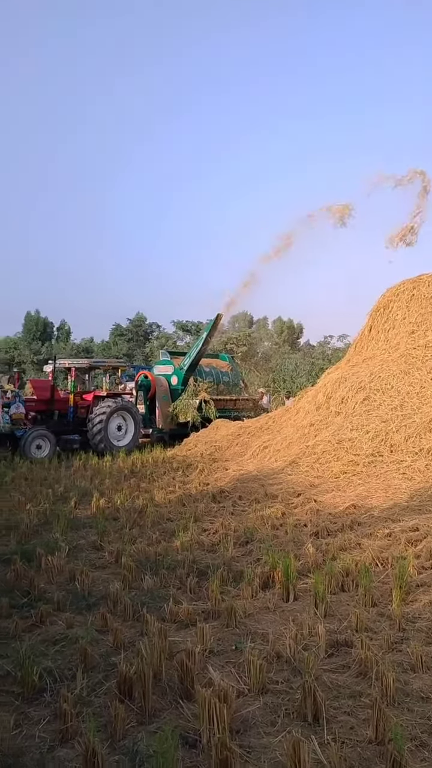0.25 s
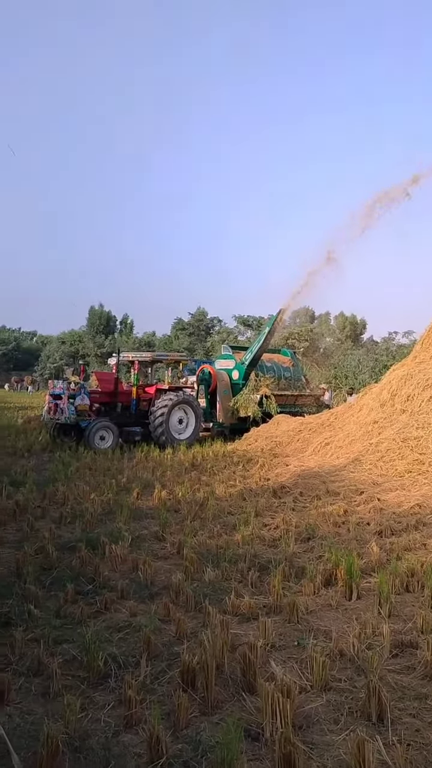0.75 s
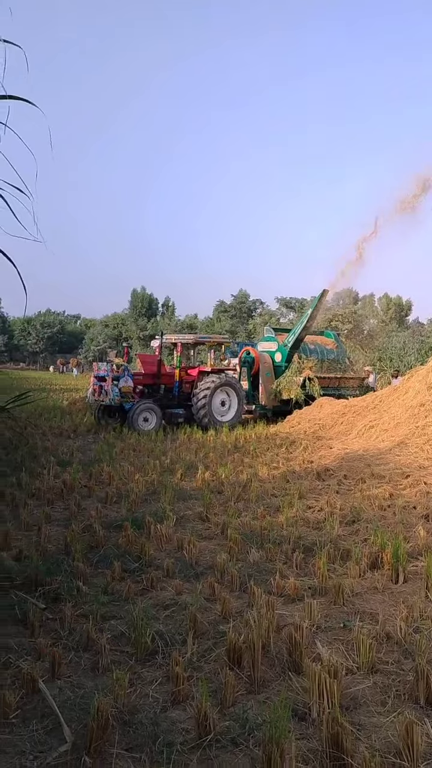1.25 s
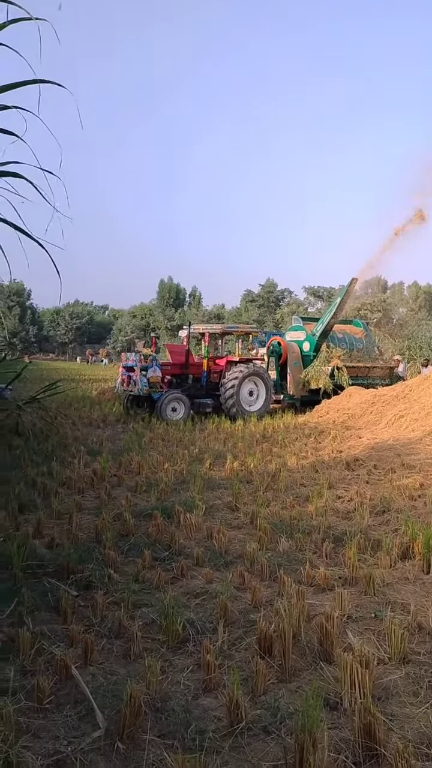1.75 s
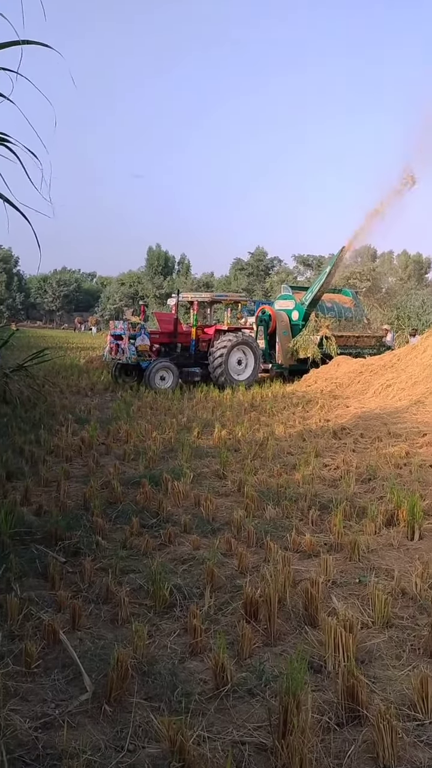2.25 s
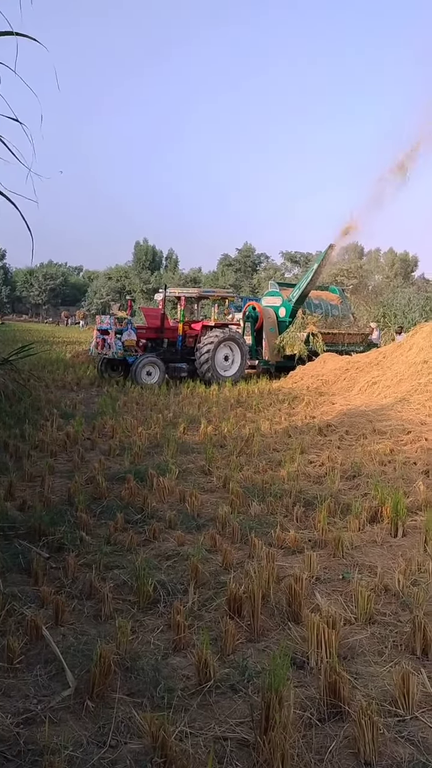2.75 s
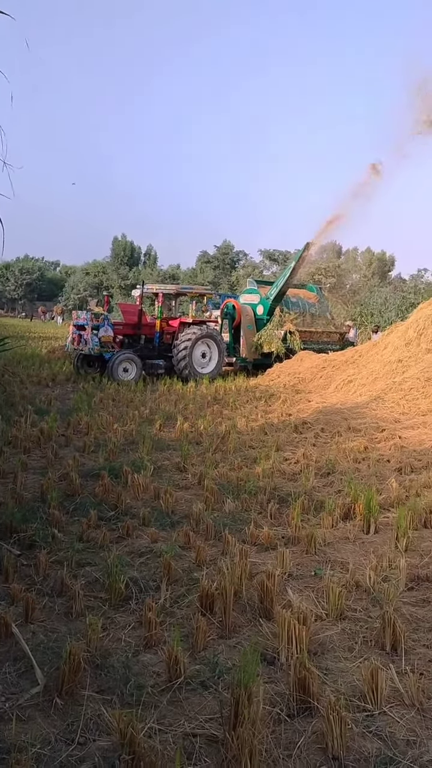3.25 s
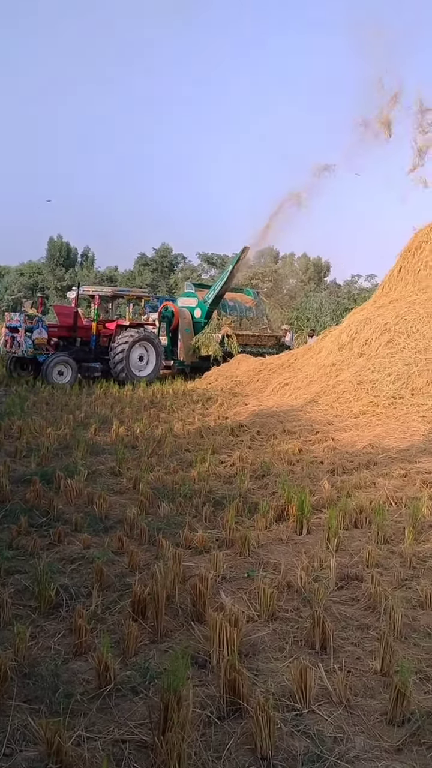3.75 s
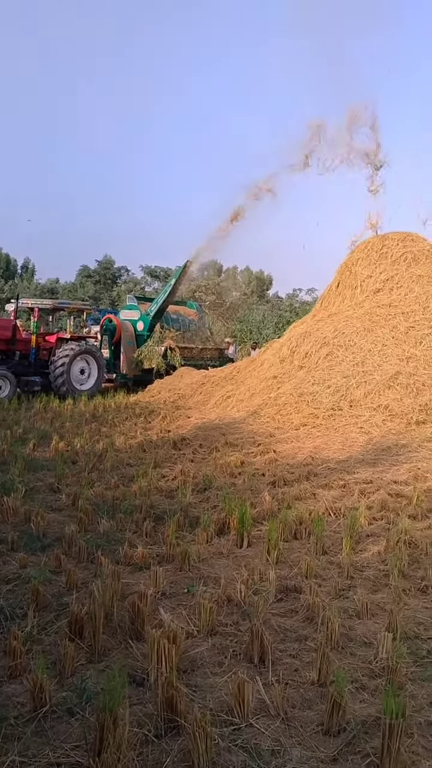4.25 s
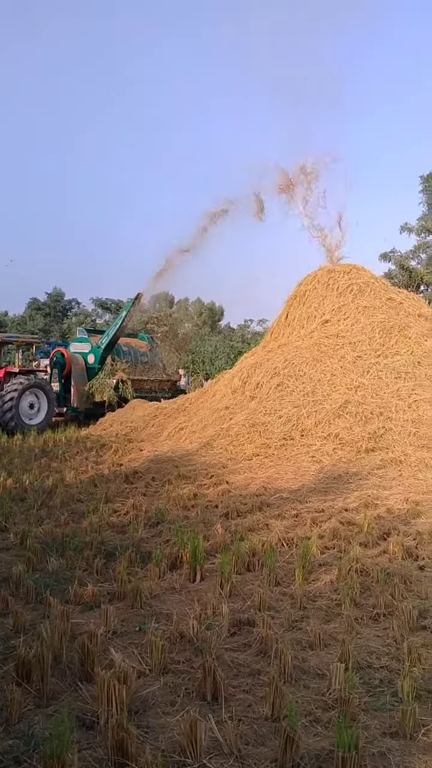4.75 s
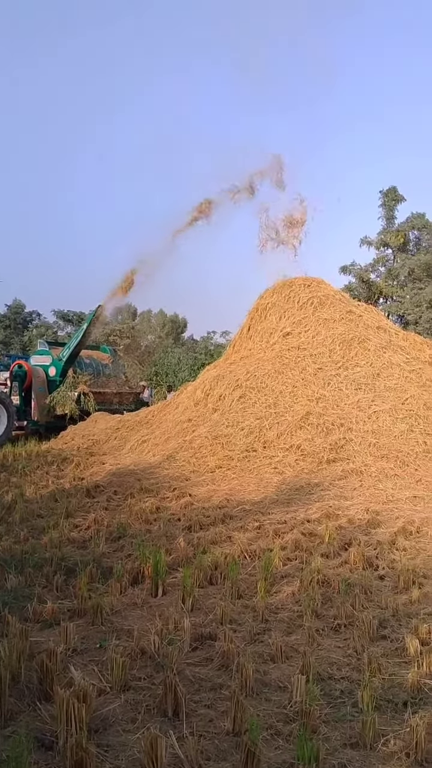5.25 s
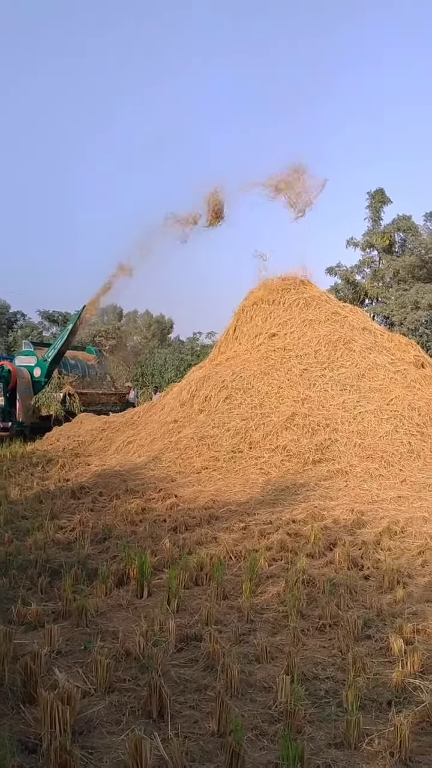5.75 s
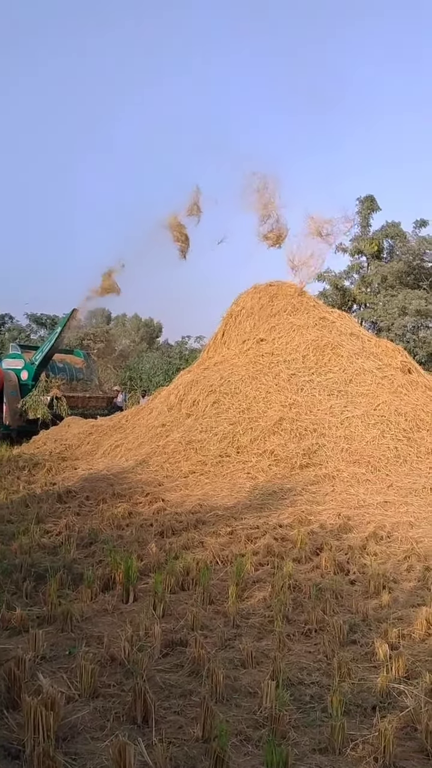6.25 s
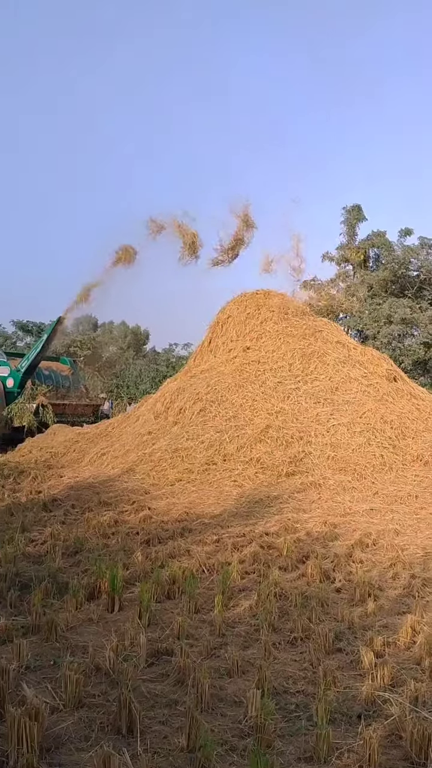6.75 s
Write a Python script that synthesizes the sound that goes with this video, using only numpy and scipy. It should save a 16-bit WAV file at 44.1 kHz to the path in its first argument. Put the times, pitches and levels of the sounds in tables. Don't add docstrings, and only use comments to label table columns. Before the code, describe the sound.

A tractor diesel drives a thresher in a harvested field, already running at the start and never stopping. A low blower hum sits under a broad, metallic roar of air and straw, with rapid diesel clatter and faint chaff hiss on top. Around five seconds a heavier feed drags the pitch down slightly, then it recovers. Heard across open stubble through a slowly turning phone, with slightly coarse treble.

```python
import sys
import numpy as np
from scipy import signal
from scipy.fft import rfft, irfft, dct, next_fast_len
from scipy.io import wavfile
from scipy.ndimage import uniform_filter1d, map_coordinates

SR = 44100
rng = np.random.default_rng(int(sys.argv[2]) if len(sys.argv) > 2 else 0)


def master_out(mix):
    frames = np.transpose(np.atleast_2d(mix))
    ceiling = np.clip(frames, -1, 1)
    pcm = np.round(ceiling * 32767).astype(np.int16)
    wavfile.write(sys.argv[1], SR, pcm)


def linear_from_db(decibels):
    return 10 ** (np.asarray(decibels, float) / 20)


N = 309582

# time_s, blade_pass_hz
BLADE_PASS = [(0, 138.6), (.3, 138.4), (1.2, 139.9), (1.55, 139.7), (1.95, 138.5), (3.2, 139.7),
              (4.4, 139.9), (4.75, 139.4), (5.02, 136.5), (5.3, 135.9), (5.6, 136.3), (6.25, 138.3),
              (7.02, 139.3)]
FREE_BLADE_PASS_HZ = 139.8
BLOWER_BLADES = 5
BLOWER_TURNS_PER_CYCLE = 2.1113
CYCLE_AT_START = .92


def unit(x):
    return x / np.sqrt(np.mean(x ** 2) + 1e-20)


def along(points, hz):
    f, v = np.transpose(points)
    return np.interp(np.log(hz + 1), np.log(f + 1), v)


def curves(rows):
    time_s, *columns = np.transpose(rows)
    return [np.interp(np.arange(N) / SR, time_s, column) for column in columns]


def wobble(knots_per_s):
    knots = rng.standard_normal(int(N * knots_per_s / SR) + 4)
    return map_coordinates(knots, [np.arange(N) * knots_per_s / SR])


def filtered(x, response):
    pad = 2048
    wide = np.pad(x, [(0, 0)] * (x.ndim - 1) + [(pad, pad)], mode="reflect")
    m = next_fast_len(N + 4 * pad)
    spectrum = rfft(wide, m) * response(np.fft.rfftfreq(m, 1 / SR))
    return irfft(spectrum, m)[..., pad:pad + N]


def patchy(patchy_db):
    z = signal.stft(rng.standard_normal((3, N)), nperseg=512)[2]
    field = uniform_filter1d(rng.standard_normal(z.shape[1:]), size=7, axis=0)
    field = uniform_filter1d(field, size=10, axis=1)
    return signal.istft(z * linear_from_db(patchy_db * unit(field)), nperseg=512)[1][:, :N]


def repeating(noise, cycle, share, size=3350):
    pattern = rng.standard_normal((len(noise), size))[:, (cycle % 1 * size).astype(int)]
    return np.sqrt(1 - share) * unit(noise) + np.sqrt(share) * pattern


def orders(turns, table, sway_db):
    total = np.zeros(N)
    for order, db in table:
        level = np.sqrt(2) * linear_from_db(db + sway_db * wobble(14))
        total += level * np.cos(2 * np.pi * (order * turns + rng.random()))
    return total


def knocks(cycle, blows, decay, rise, scatter_db):
    out = np.zeros(N)
    for place, db in blows:
        turns = cycle - place + 1
        size = linear_from_db(db + scatter_db * rng.standard_normal(int(turns[-1]) + 2))
        since = turns % 1
        out += size[turns.astype(int)] * np.exp(-since / decay) * (1 - np.exp(-since / rise))
    return out


def panel_gain(f, panels):
    resonances = sum(linear_from_db(db) ** 2 * width ** 2 / (width ** 2 + 4 * (f - centre) ** 2)
                     for centre, width, db in panels)
    return np.sqrt(1 + resonances)


def casing(f):
    # centre_hz, width_hz, level_db over the noise
    panels = [(228.5, 14, 6), (2390, 65, -6.5), (603.6, 4.1, 9), (698.6, 44, 4), (867, 24, 2.5),
              (990, 27, 2), (1051, 4.3, 3.5), (1155, 27, -5.5), (1327, 17, 4.5), (1463, 80, 3),
              (1620, 15, -3.5), (2197, 10, -16), (2573, 6.4, 6.5), (2860, 13, -10.5), (3200, 45, 1.5),
              (3880, 40, -9.5), (4390, 150, -1), (5840, 300, -0.5), (7840, 260, 2.5)]
    return panel_gain(f, panels)


def sag_hz():
    return FREE_BLADE_PASS_HZ - curves(BLADE_PASS)[0]


def heading():
    # time_s, heading
    phone_heading = [
        (0, 0.7),
        (1, 0.26),
        (1.8, 0.3),
        (3.8, 0.2),
        (4.5, 0.48),
        (5.3, 0.8),
        (7.02, 0.7),
    ]
    return np.clip(curves(phone_heading)[0], 0, 1)


def blower(shaft):
    blade_orders = [(4, -23), (5, 0.5), (6, -32.5), (8, -26.5), (10, -20)]
    level_db = -26.5 - .56 * sag_hz() + .5 * wobble(6)
    return linear_from_db(level_db) * orders(shaft, blade_orders, sway_db=.4)


def exhaust(cycle):
    firing_orders = [(4, 0.5), (8, -1)]
    return linear_from_db(-40 + .02 * sag_hz()) * orders(cycle, firing_orders, sway_db=.2)


def chassis(cycle):
    frame_orders = [(12, -5.5), (14, -7.5), (16, -3), (22, -9.5), (23, -18), (24, -19), (26, -25)]
    return linear_from_db(-40 - 1.76 * sag_hz()) * orders(cycle, frame_orders, sway_db=.4)


def roar(shaft):
    # freq_hz, level_db_per_hz
    rush_spectrum = [(20, -42), (40, -17), (65, -10.5), (130, -2.5), (220, -4), (300, -4.5), (450, -12),
                     (700, -9.5), (1000, -10), (1450, -12), (1650, -14.5), (2200, -11.5), (4000, -20),
                     (8000, -66)]
    boom_top_hz, boom_db_per_hz_sag = 380, -.4
    swell = linear_from_db(.7 * np.cos(2 * np.pi * shaft) + .4 * wobble(9))
    rush = filtered(swell * patchy(patchy_db=.7), lambda f: linear_from_db(along(rush_spectrum, f)) * casing(f))
    boom = filtered(rush, lambda f: 1 / (1 + (f / boom_top_hz) ** 4))
    thinned = rush + (linear_from_db(boom_db_per_hz_sag * sag_hz()) - 1) * boom
    return linear_from_db(-35 - .53 * heading()) * unit(thinned)


def clatter(cycle):
    firings = [
        (0, -6.5),
        (0.251, -1.5),
        (0.501, -2.5),
        (0.751, -2.5),
    ]
    # freq_hz, level_db_per_hz
    block_spectrum = [(400, -42.5), (900, -6.5), (1400, 0), (1700, 0.5), (2200, 3), (2700, -17), (3600, -7),
                      (4300, -11.5), (5200, -17.5), (6500, -25.5), (7500, -38), (8200, -51), (9000, -91)]
    gate = 1.1 + knocks(cycle, firings, decay=.098, rise=.012, scatter_db=0)
    noise = repeating(patchy(patchy_db=.6), cycle, share=.65)
    rattle = filtered(gate * linear_from_db(.45 * wobble(9.7)) * noise,
                      lambda f: linear_from_db(along(block_spectrum, f)) * casing(f))
    return linear_from_db(-43 + 2.65 * heading()) * unit(rattle)


def tappets(cycle):
    snaps = [
        (.1, -3),
        (.21, -4),
        (.3, -3),
        (.5, -1),
        (.75, -3),
        (.83, -3),
    ]
    # freq_hz, level_db_per_hz
    cover_spectrum = [(400, -64.5), (700, -26), (950, 2), (1250, 8.5), (1600, 3), (2200, -2.5), (3500, -33),
                      (5000, -61.5), (7000, -120)]
    gate = knocks(cycle, snaps, decay=.045, rise=.006, scatter_db=1.5)
    noise = repeating(patchy(patchy_db=1.3), cycle, share=.85)
    return linear_from_db(-48) * unit(filtered(gate * noise, lambda f: linear_from_db(along(cover_spectrum, f))))


def pings(cycle):
    modes = [
        (.26, 1050, -38),
        (.26, 2100, -41),
        (.49, 1400, -38),
        (.52, 2400, -36.5),
        (.76, 1480, -36),
        (.75, 3700, -46),
    ]
    rise_s, fall_s, scatter_db, detune = .0012, .003, 1.5, .006
    out = np.zeros(N)
    cycle_s = 1 / (SR * np.gradient(cycle))
    for place, hz, db in modes:
        turns = cycle - place + 1
        draws = rng.standard_normal((int(turns[-1]) + 2, 2))
        size, pitch = draws[turns.astype(int)].T
        t = turns % 1 * cycle_s
        shape = 2 * np.exp(-t / fall_s) * (1 - np.exp(-t / rise_s))
        out += linear_from_db(db + scatter_db * size) * shape * np.sin(2 * np.pi * hz * (1 + detune * pitch) * t)
    return out


def chaff(cycle):
    # freq_hz, level_db_per_hz
    hiss_spectrum = [(7000, -26.5), (8300, -12.5), (8900, -8), (9600, -6.5), (11000, 1), (12700, 0.5),
                     (14500, 1.5), (15700, -1)]
    pulse_db = 1.1 * np.cos(2 * np.pi * (4 * cycle - .25))
    gate = linear_from_db(pulse_db + .3 * wobble(13) + .8 * wobble(24))
    hiss = filtered(gate * patchy(patchy_db=.5)[1:], lambda f: linear_from_db(along(hiss_spectrum, f)))
    return linear_from_db(-62.9 + 3 * heading()) * unit(hiss) * linear_from_db([[-2.1], [2.1]])


def scatter(noise):
    # freq_hz, level_db
    scatter_spectrum = [(60, -25), (250, -11), (500, -9), (1500, -7), (2500, -5), (4000, 1), (6000, 5),
                        (9000, 7)]
    # freq_hz, right_lean_db
    right_lean = [(250, 3.5), (500, 0.5), (2000, 1.1), (4500, 1), (5300, 4.5), (6200, -1), (7600, 4.5)]
    return filtered(noise, lambda f: linear_from_db(along(scatter_spectrum, f)
                                         + np.outer([-1, 1], along(right_lean, f))))


def ports(straight, echoes, lag_ms, treble_db):
    left_ms, left_gain, right_ms, right_gain = np.transpose(echoes)

    def delay(f, ms):
        return np.exp(-2j * np.pi * f * ms / 1000)

    def path(f, ms, gains):
        dull = np.exp(-f / 7000)
        return 1 + dull * sum(g * delay(f, t) for t, g in zip(ms, gains))

    def response(f):
        shade = linear_from_db(treble_db * f * f / (f * f + 1500 ** 2))
        left = path(f, left_ms, left_gain) / shade
        right = path(f, right_ms, right_gain) * shade * delay(f, lag_ms)
        return np.array([left, right])

    return filtered(straight, response)


def scene():
    # left_delay_ms, left_gain, right_delay_ms, right_gain; at heading 0 and 1
    facing_echoes = [(0.15, 0.575, 0.274, 0.838), (0.792, 0.053, 0.521, -0.244),
                     (1.631, 0.181, 1.417, 0.12), (1.915, 0.191, 1.606, 0.723),
                     (2.08, 0.375, 1.949, -0.376), (2.4, -0.182, 2.439, 0.091)]
    turned_echoes = [(0.15, 0.663, 0.254, 0.876), (0.341, 0.459, 0.411, 1.1), (0.768, 0.035, 0.475, -1.1),
                     (1.471, 0.2, 0.557, 0.377), (1.873, 0.252, 1.51, 0.677),
                     (2.571, -0.117, 1.998, -0.392)]
    # centre_hz, width_hz, level_db
    body = [
        [(673, 210, -2.5), (2480, 170, 0.5), (3720, 180, -4)],
        [(864, 280, -1.5), (3470, 200, -4.5), (5900, 920, -5)],
    ]
    shaft = np.cumsum(curves(BLADE_PASS)[0]) / SR / BLOWER_BLADES
    cycle = CYCLE_AT_START + shaft / BLOWER_TURNS_PER_CYCLE
    hums = blower(shaft) + exhaust(cycle) + chassis(cycle)
    noise = roar(shaft) + clatter(cycle) + tappets(cycle)
    noise = noise + pings(cycle) * [[1], [0], [0]]
    scattered = scatter(noise[1:])
    facing = ports(noise[0], facing_echoes, lag_ms=.084, treble_db=.47) + scattered
    turned = ports(noise[0], turned_echoes, lag_ms=.025, treble_db=.22) + scattered
    facing = filtered(facing, lambda f: panel_gain(f, body[0]))
    turned = filtered(turned, lambda f: panel_gain(f, body[1]))
    turn = heading()
    return (1 - turn) * facing + turn * turned + hums * linear_from_db([[-.3], [.3]]) + chaff(cycle)


def phone_rounding(x, size=1024, start=620):
    # freq_hz, step_db over band rms
    coarseness = [(1000, -24), (3000, -17), (4700, -10), (6000, 1), (7300, 8.5), (8500, 11), (9600, 6.5),
                  (11000, 3.5), (14500, 3.5), (15700, 9)]
    window = np.sin(np.pi * (np.arange(2 * size) + .5) / (2 * size))
    padded = np.pad(x, ((0, 0), (2 * size - start, 3 * size)), mode="reflect")
    blocks = padded[:, :padded.shape[1] // size * size].reshape(len(x), -1, size)
    frames = np.concatenate([blocks[:, :-1], blocks[:, 1:]], axis=2) * window
    a, b, c, d = np.split(frames, 4, axis=2)
    folded = np.concatenate([-c[..., ::-1] - d, a - b[..., ::-1]], axis=2)
    lines = dct(folded, type=4, norm="ortho")

    bands = lines.reshape(*lines.shape[:2], -1, 16)
    band_hz = (np.arange(bands.shape[2]) + .5) * SR / 2 / bands.shape[2]
    rms = np.sqrt(uniform_filter1d(np.mean(bands ** 2, axis=3), size=5, axis=1) + 1e-18)
    frame_db = 1.3 * rng.standard_normal((rms.shape[1], 1))
    band_db = 2.2 * unit(uniform_filter1d(rng.standard_normal(rms.shape[1:]), size=3, axis=0))
    step = (rms * linear_from_db(along(coarseness, band_hz) + frame_db + band_db))[..., None]
    rounded = (np.round(bands / step) * step).reshape(lines.shape)

    u, v = np.split(dct(rounded, type=4, norm="ortho"), 2, axis=2)
    unfolded = np.concatenate([v, -v[..., ::-1], -u[..., ::-1], -u], axis=2) * window
    head, tail = np.split(unfolded, 2, axis=2)
    return (head[:, 1:] + tail[:, :-1]).reshape(len(x), -1)[:, size - start:][:, :N]


def band_limit(x):
    return signal.sosfilt(signal.butter(12, 15760, fs=SR, output="sos"), x)


def record(dry):
    sum_difference = np.array([[1, .9], [1, -1.007]]) / np.sqrt(2)
    edge = np.minimum(np.arange(N), np.arange(N)[::-1]) / (.004 * SR)
    eased = dry * np.sin(np.pi / 2 * np.clip(edge, 0, 1)) ** 2
    mix = sum_difference @ phone_rounding(sum_difference @ eased)
    return band_limit(mix)


dry = scene()
out = record(dry)
master_out(out)
```